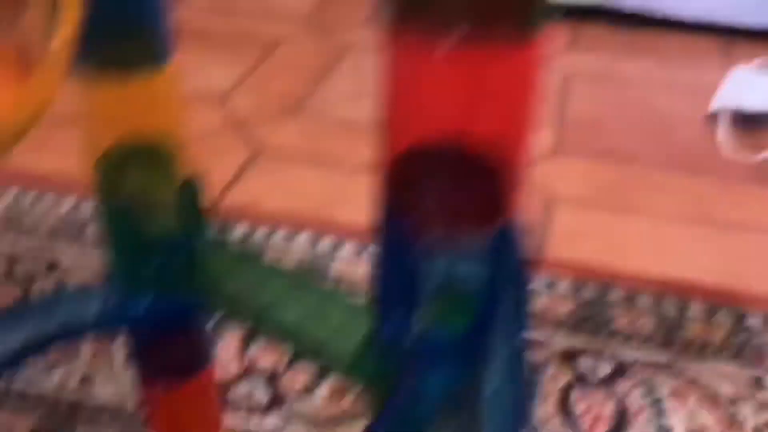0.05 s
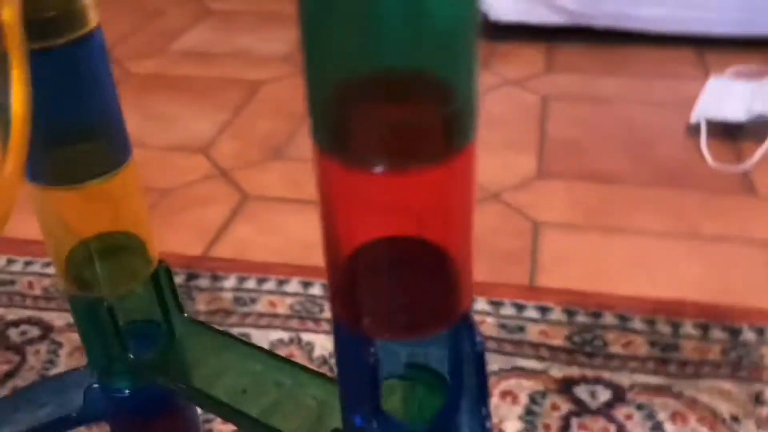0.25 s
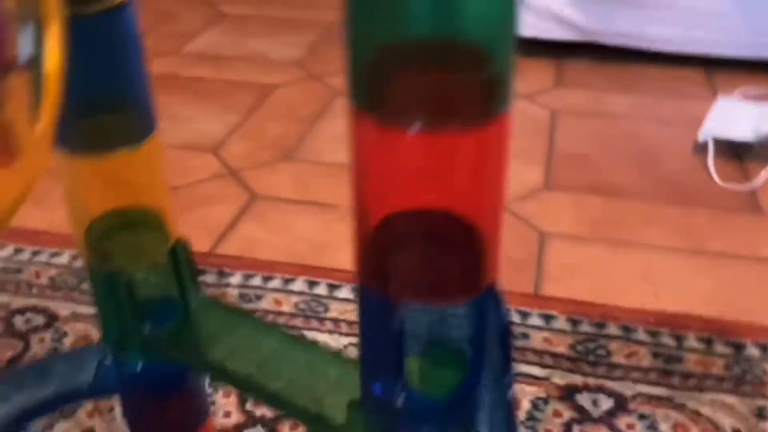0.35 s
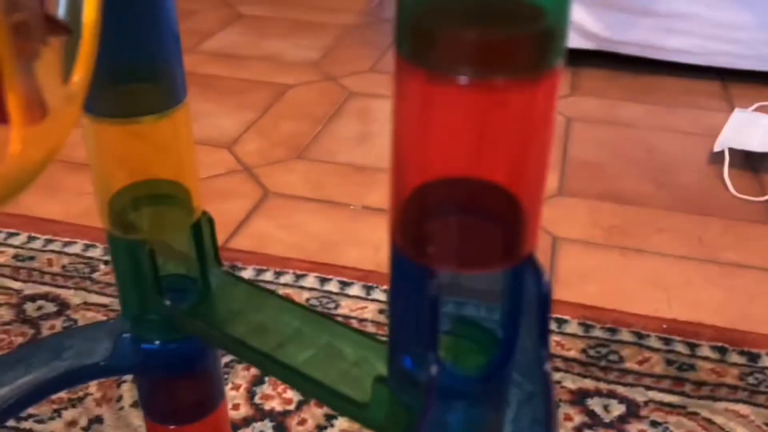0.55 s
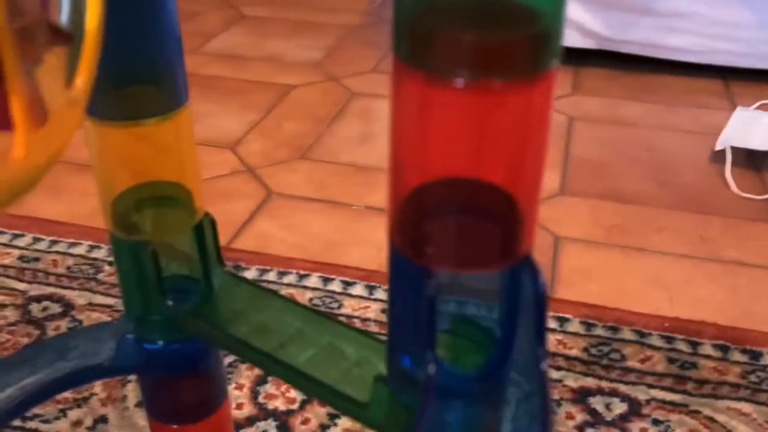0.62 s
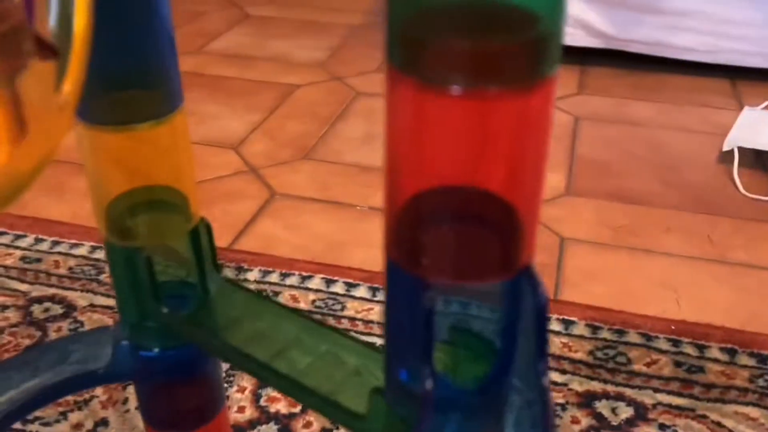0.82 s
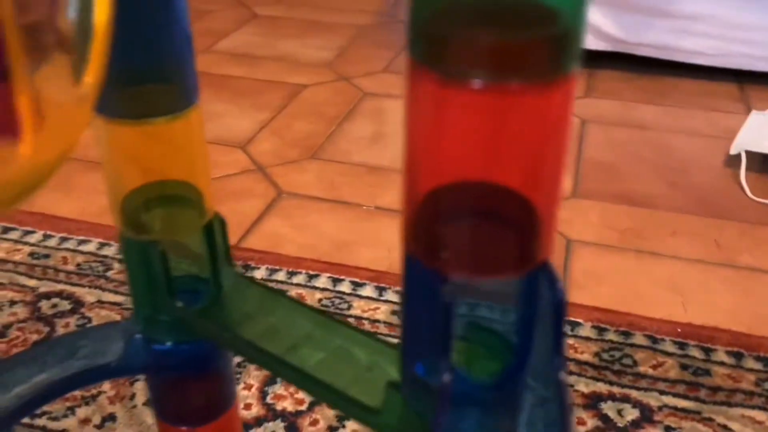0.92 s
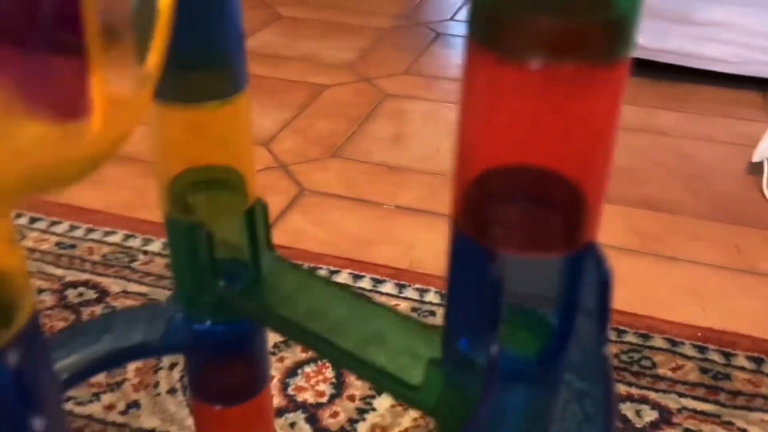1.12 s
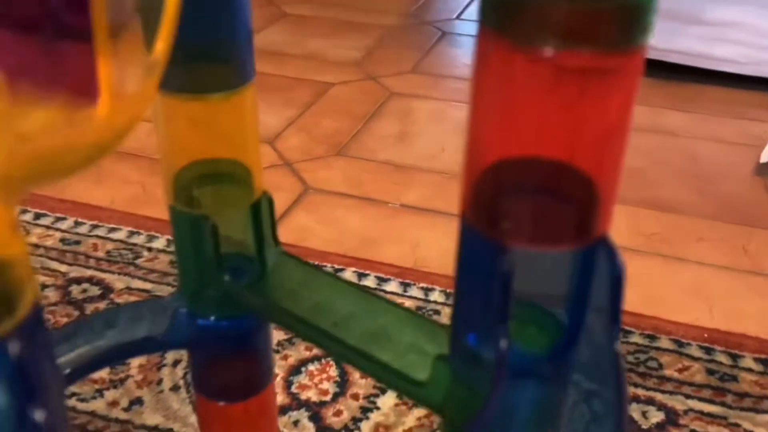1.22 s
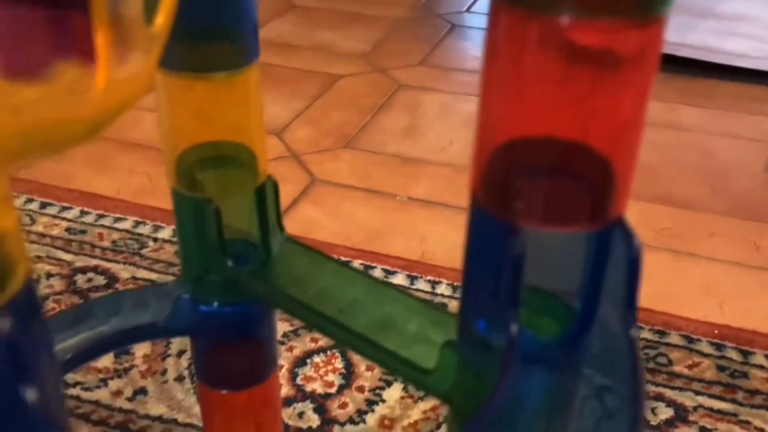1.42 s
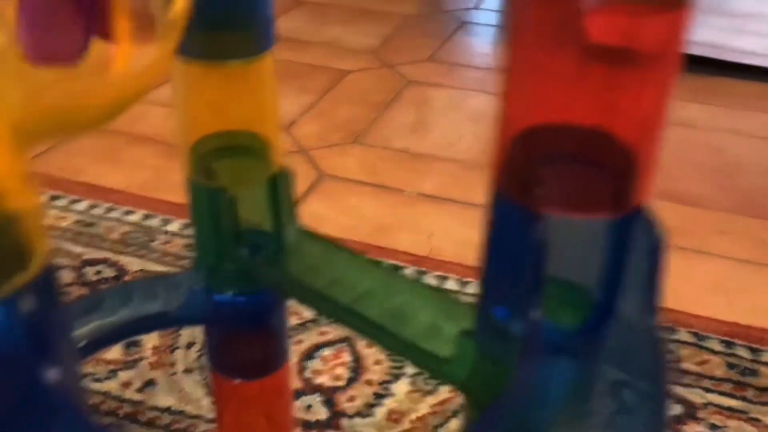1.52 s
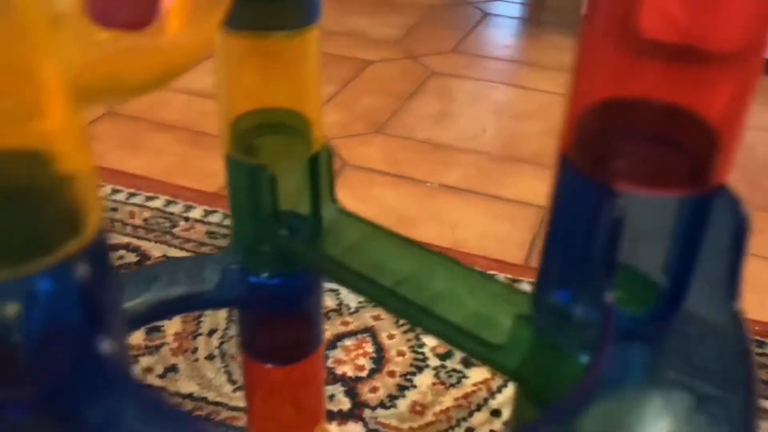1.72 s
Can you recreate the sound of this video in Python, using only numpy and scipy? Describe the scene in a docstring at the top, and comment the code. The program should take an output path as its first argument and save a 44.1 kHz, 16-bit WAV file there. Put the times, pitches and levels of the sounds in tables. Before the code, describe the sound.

A marble clatters through a plastic marble run, close by in a living room. Light taps open over soft funnel rolling. From 0.2 seconds the chute rattles and short knocks crowd in, with faint low thumps. Hollow knocks stand out around 0.8 seconds, bright clacks at 1.1, and hollow knocks again at 1.3. After 1.5 seconds only the soft rolling continues. Faint handling rumble lies underneath.

```python
"""A plastic marble run on a living-room floor, close to a hand-held stereo microphone.
A marble rolls in a funnel, a little to the left, and the first light knocks come down the tubes.
From 0.2 s the chute rattles and the knocks crowd in, each briefly ringing the plastic; heavy landings
sway the tower. Hollow knocks lead around 0.8 s, bright clacks at 1.1 s, hollow ones again at 1.3 s.
After 1.5 s the rolling carries on. Throughout, the hand on the microphone rumbles faintly."""
import sys
import numpy as np
from scipy import signal
from scipy.fft import rfft, irfft, next_fast_len
from scipy.io import wavfile

SR = 44100
rng = np.random.default_rng(int(sys.argv[2]) if len(sys.argv) > 2 else 0)


def wav_out(sig):
    """Save sig, one row per channel (or a flat mono array), as 16-bit PCM at SR to the path in sys.argv[1]."""
    wavfile.write(sys.argv[1], SR, np.round(np.clip(np.atleast_2d(sig).T, -1, 1) * 32767).astype(np.int16))


N = 77175
T = np.arange(N) / SR
RING_T = T[:4096]

# Marble contacts: start_s, thud_db, hollow_knock_db, clack_db, wall_ring_db, tick_db,
# then any pitch_hz of the struck spot, strongest first
CONTACTS = [(.0786, -49, -50, -42, -46, -47), (.1393, -45, -38, -40, -49, -42),
            (.1991, -41, -45, -42, -40, -33), (.2111, -49, -56, -54, -54, -32, 10570),
            (.226, -42, -35, -29, -30, -30, 10350), (.2499, -41, -44, -37, -34, -43),
            (.3296, -35, -29, -30, -25, -28, 3940), (.3574, -47, -35, -34, -31, -39, 3870),
            (.3672, -50, -40, -41, -33, -45, 3930), (.4025, -35, -29, -25, -20, -22, 3420, 2850, 6900),
            (.4365, -42, -32, -40, -42, -32), (.4534, -44, -32, -40, -42, -30, 10900),
            (.4655, -44, -34, -36, -36, -30), (.4746, -31, -28, -25, -21, -25, 3600),
            (.5196, -29, -29, -22, -21, -30, 3600, 650), (.493, -38, -34, -33, -33, -38),
            (.5535, -48, -42, -40, -36, -34), (.5899, -36, -26, -30, -32, -28, 1897),
            (.5954, -34, -38, -29, -28, -25),
            (.6247, -33, -23, -24, -20, -15, 10150, 6767, 5800, 5200, 4323),
            (.6431, -37, -37, -42, -34, -29), (.6687, -41, -29, -28, -29, -22, 1380, 2780),
            (.711, -50, -35, -32, -32, -31), (.7243, -40, -30, -33, -42, -46),
            (.7313, -46, -31, -30, -36, -35), (.745, -45, -26, -28, -35, -39),
            (.7623, -47, -30, -28, -45, -32),
            (.7743, -29, -12, -28, -22, -36, 1735, 1850, 1300, 4350, 3451, 810),
            (.7957, -50, -30, -27, -41, -36, 2386), (.8074, -55, -38, -30, -48, -43),
            (.8289, -29, -19, -20, -27, -37, 2374, 1600, 1860, 4371, 800),
            (.8681, -32, -19, -23, -26, -30, 1690, 2660, 4400), (.882, -43, -29, -42, -34, -28, 8600),
            (.9104, -44, -38, -40, -31, -33), (.9164, -44, -50, -47, -43, -34),
            (.938, -38, -45, -35, -39, -18, 11230, 10600), (.946, -41, -40, -32, -30, -35),
            (.966, -43, -50, -43, -34, -46), (.9825, -39, -35, -40, -27, -35, 4500),
            (1.0457, -55, -58, -46, -45, -39),
            (1.0986, -34, -26, -15, -16, -18, 2708, 3542, 2900, 10350, 7230),
            (1.1216, -37, -29, -19, -19, -22, 2740, 3950, 4800),
            (1.1755, -30, -22, -21, -24, -22, 2550, 1800, 3780), (1.1892, -39, -31, -28, -27, -32),
            (1.2052, -32, -23, -23, -20, -20, 3800, 6837, 1800),
            (1.2276, -30, -19, -24, -23, -27, 1576, 1338, 4600), (1.2489, -44, -28, -24, -27, -31),
            (1.271, -45, -34, -38, -38, -42), (1.315, -50, -37, -48, -43, -39),
            (1.3384, -26, -14, -24, -26, -24, 1800, 1620, 2230, 380),
            (1.4163, -34, -19, -30, -28, -32, 1790, 1640), (1.451, -40, -25, -33, -33, -37, 1730),
            (1.467, -55, -29, -46, -41, -42, 1700)]
# The plastic's registers (thud, hollow knock, clack, wall ring): low_hz, high_hz, dense_t60_s, dense_db
REGISTERS = [(342, 990, 0.039, 1.5), (1178, 1905, 0.035, -2.5), (2070, 3200, 0.042, -1.5),
             (3010, 5260, 0.033, 0)]
# Earlier arrival at the microphone's left side, for the four registers and the tick: lead_ms
ARRIVAL_LEADS = [.09, .115, .05, .04, -.272]
def knocks():
    """Each contact rings four registers of the plastic and ticks; the struck spot's modes stand out."""
    spot_over_ring_db, spot_over_tick_db, trim_db = 7, 3, .3
    tower_pan = from_db([[2.5], [-2.5]])   # the thud comes from the tower on the left
    out = np.zeros((2, N))
    for start_s, thud_db, knock_db, clack_db, ring_db, tick_db, *spot_hz in CONTACTS:
        voices = [at_level(plastic_ring(*register), -spot_over_ring_db) for register in REGISTERS]
        voices.append(at_level(tick(), -spot_over_tick_db))
        levels_db = (thud_db, knock_db, clack_db, ring_db, tick_db)
        aside_ms = .01 * rng.standard_normal()   # contacts lie on different parts of the run
        for register, (voice, db, lead_ms) in enumerate(zip(voices, levels_db, ARRIVAL_LEADS)):
            own_hz = [hz for hz in spot_hz if sum(hz > band[1] for band in REGISTERS) == register]
            sound = at_level(voice + at_level(struck_spot(own_hz), 0), db + trim_db)
            if register == 0:
                sound = sound * tower_pan
            place(out, sound, start_s, (lead_ms + aside_ms) / 1000)
    low_cut = signal.butter(2, 234, "high", fs=SR, output="sos")   # the knocks carry little below about 234 Hz
    return signal.sosfilt(low_cut, out)


# Main resonances of the plastic: pitch_hz, relative_db, t60_s
PLASTIC_MODES = [(410, -16, 0.028), (642, -10, 0.045), (800, 1.5, 0.029), (1318, -9.5, .016),
                 (1538, -3.5, .016), (1772, -1.5, 0.011), (1883, -3.5, 0.026), (2400, -5.5, .024),
                 (2710, 1.5, 0.031), (2776, -4.5, 0.027), (3507, 5.5, 0.036), (3870, -13.5, 0.015),
                 (4420, 13, 0.02), (5050, 8, .016)]
def plastic_ring(low_hz, high_hz, dense_t60_s, dense_db):
    """One blow on one register of the plastic: a few strong modes amid many weak ones."""
    level_spread_db, pitch_spread = 5.5, .016   # each contact finds another spot on another part
    strong = 0
    for hz, db, t60_s in PLASTIC_MODES:
        strength, detune = rng.standard_normal(2)
        if low_hz <= hz < high_hz:
            gain = from_db(db + level_spread_db * strength)
            strong = strong + gain * mode(hz * (1 + pitch_spread * detune), t60_s)
    band = signal.butter(2, [low_hz, high_hz], "band", fs=SR, output="sos")
    dense = signal.sosfilt(band, white_burst() * decay(dense_t60_s))
    return (at_level(strong, 0) + at_level(dense, dense_db)) * swell()


def struck_spot(pitches_hz, step_db=3.5, t60_at_1khz_s=.026):
    """The struck spot's own modes start together; the higher ones die sooner."""
    out = np.zeros(len(RING_T))
    for rank, hz in enumerate(pitches_hz):
        t60_s = t60_at_1khz_s * (1000 / hz) ** .4
        out += from_db(-step_db * rank) * np.sin(2 * np.pi * hz * RING_T) * decay(t60_s)
    return out * swell()


# Spectrum of the tick at close range: frequency_hz, gain_db
TICK_SPECTRUM = [(1500, -41.5), (4500, -12.5), (5900, 0), (7000, 2), (8200, -1.5), (9100, -4), (10300, 2),
                 (11800, -3.5), (13500, -7), (15200, -6.5), (17000, -28)]
def tick():
    """The hard snap of glass on plastic, with a short bright tail."""
    envelope = decay(t60_s=.015) + from_db(-3) * decay(t60_s=.021)
    return colour(white_burst() * envelope * swell(build_up_s=.0001), TICK_SPECTRUM)


# Rattle of the chute at the microphone: time_s, level_db
RATTLE_LEVELS = [(0, -50), (.18, -55.5), (.23, -32), (.29, -49), (.40, -39.5), (.44, -32), (.53, -33),
                 (.58, -39.5), (.65, -37), (.70, -48), (.8, -42), (.86, -50.5), (.95, -41), (1.05, -45.5),
                 (1.22, -52), (1.255, -32), (1.32, -53), (1.47, -39), (1.53, -53), (1.75, -59)]
# Resonances of the chute: frequency_hz, gain_db
RATTLE_SPECTRUM = [(200, -15), (600, 1.5), (1100, -24), (1700, 11.5), (2200, 6.5), (2700, 5), (4300, 4.5),
                   (6000, -7.5), (7300, -6), (9100, -19), (10800, -7), (13500, -20), (15300, -20),
                   (17000, -17)]
def rattle(hops_per_s=300, spread_db=3.2, spot_count=6):
    """A marble makes tiny hops along the chute, landing on spots that each ring briefly."""
    hops = rng.random(N) < hops_per_s / SR
    blows = hops * from_db(spread_db * np.minimum(rng.exponential(1, N), 3))
    spots = rng.integers(0, spot_count, N)
    out = np.zeros((2, N))
    for spot in range(spot_count):
        ring = white_burst(width=1) * decay(t60_s=.023)
        out += signal.fftconvolve([blows * (spots == spot)], ring, axes=1)[:, :N]
    return rms_one(colour(out, RATTLE_SPECTRUM)) * from_db(curve(RATTLE_LEVELS, T))


# Rise and fall of the rolling: time_s, relative_db
ROLLING_LEVELS = [(0, -37.5), (.17, -41.5), (.32, -39), (.5, -34.5), (.8, -41), (1.05, -40), (1.25, -37),
                  (1.4, -40.5), (1.75, -38.5)]
# Hollow resonances of the funnel: frequency_hz, gain_db
FUNNEL_SPECTRUM = [(100, -40), (200, -16.5), (420, -12.5), (660, -7.5), (850, -1.5), (1000, -2.5),
                   (1250, -8.5), (1620, 3.5), (1850, 2.5), (2200, -9.5), (2720, -4), (3300, -16.5),
                   (4500, -21), (6000, -36.5), (7400, -30.5), (9000, -64), (11000, -42), (16000, -60)]
def rolling(trim_db=2.5):
    """A marble circling in the funnel keeps the hollow resonances murmuring."""
    return stereo_noise(FUNNEL_SPECTRUM) * from_db(curve(ROLLING_LEVELS, T) + trim_db)


# Heavy landings, heard in the centre: start_s, pitch_hz, envelope_db, t60_s
LANDINGS = [(.33, 133, -49, 0.13), (.625, 70.6, -52, 0.17), (0.786, 80.7, -50, 0.24),
            (.96, 79.8, -51, 0.27), (1.338, 59.6, -43, 0.028), (1.338, 290, -18, .018)]
def tower_thumps(build_up_s=.0025):
    """The tower sways against the floor after a heavy landing, low and soft."""
    out = np.zeros((2, N))
    for start_s, hz, db, t60_s in LANDINGS:
        t = np.maximum(T - start_s, 0)
        out += from_db(db) * np.sin(2 * np.pi * hz * t) * swell(build_up_s, t) * decay(t60_s, t)
    return out


# Tone of the living room's reflections: frequency_hz, gain_db
ROOM_SPECTRUM = [(100, 1), (700, 1.5), (1700, -0.5), (4000, 3.5), (8000, -5), (16000, -22)]
def room(x, t60_s=.35, delay_s=.0079, send_db=-15.5):
    """The furnished room returns a diffuse tail, different on each side of the microphone."""
    t = T[:SR // 2]
    tail = rng.standard_normal((2, len(t))) * decay(t60_s, t) * (t > delay_s)
    tail = colour(tail / np.sqrt(np.sum(tail ** 2) / 2), ROOM_SPECTRUM)
    return from_db(send_db) * signal.fftconvolve(x, tail, axes=1)[:, :N]


# Handling noise at the microphone: time_s, level_db
HANDLING_LEVELS = [(0, -77), (.31, -61.5), (.4, -57.5), (.9, -63), (1.12, -56), (1.45, -67.5), (1.75, -78)]
# Spectrum of the handling noise: frequency_hz, gain_db
HANDLING_SPECTRUM = [(20, -37), (45, -24), (80, 9.5), (110, 5), (165, 14.5), (260, -1), (500, -51)]
def handling():
    """The hand holding the microphone makes a faint rumble."""
    return stereo_noise(HANDLING_SPECTRUM) * from_db(curve(HANDLING_LEVELS, T))


# Likeness of the microphone's two channels: frequency_hz, correlation
CHANNEL_LIKENESS = [(60, 0.67), (500, 1), (1500, 1), (3000, 0.24), (8000, 0.075)]
def stereo_noise(spectrum, left_lead_ms=.2):
    """Coloured noise of rms 1, wide in the treble, reaching the left side first."""
    size = 2 * next_fast_len(N // 2 + 1)
    alike = per_bin(CHANNEL_LIKENESS, size)
    mid, side = rfft(rng.standard_normal((2, size)))
    channels = np.sqrt(1 + alike) * mid + np.sqrt(1 - alike) * side * [[1], [-1]]
    left, right = irfft(from_db(per_bin(spectrum, size)) * channels)
    right = np.roll(right, int(left_lead_ms * SR / 1000))
    return rms_one(np.array([left, right])[:, :N])


def mode(hz, t60_s):
    """One decaying sine, slightly out of step between the channels."""
    phase = rng.uniform(0, 2 * np.pi) + .27 * rng.standard_normal((2, 1))
    return np.sin(2 * np.pi * hz * RING_T + phase) * decay(t60_s)


def white_burst(width=.54):
    """White noise shared by both channels, plus each one's own, scaled by width."""
    return rng.standard_normal(len(RING_T)) + width * rng.standard_normal((2, len(RING_T)))


def swell(build_up_s=.00091, t=RING_T):
    """A ring takes a moment to spread through the part."""
    return 1 - np.exp(-t / build_up_s)


def decay(t60_s, t=RING_T):
    """Envelope that falls 60 dB in t60_s."""
    return np.exp(-np.log(1000) * t / t60_s)


def at_level(x, db, window_s=.0071):
    """Give the start of a ring its rms level."""
    onset = x[..., RING_T < window_s]
    return from_db(db) * x / np.sqrt(np.mean(onset ** 2) + 1e-20)


def place(out, x, start_s, left_lead_s):
    """Mix in a stereo sound, its right channel shifted by left_lead_s."""
    for channel, arrival_s in enumerate((start_s, start_s + left_lead_s)):
        i = int(arrival_s * SR)
        out[channel, i:i + x.shape[1]] += x[channel, :N - i]


def colour(x, spectrum):
    """Causal (minimum-phase) filter with a (frequency_hz, gain_db) response."""
    size = 2 * next_fast_len(x.shape[-1])
    cepstrum = irfft(np.log(from_db(per_bin(spectrum, size))))
    cepstrum[1:size // 2] *= 2
    cepstrum[size // 2 + 1:] = 0
    return irfft(rfft(x, size) * np.exp(rfft(cepstrum)))[..., :x.shape[-1]]


def per_bin(rows, size):
    """Read (frequency_hz, value) rows on an FFT grid."""
    hz, value = np.transpose(rows)
    bin_hz = np.arange(size // 2 + 1) * SR / size
    return np.interp(np.log(bin_hz + 1), np.log(hz), value)


def curve(rows, t):
    """Read (time_s, value) rows at times t."""
    return np.interp(t, *np.transpose(rows))


def from_db(db):
    """Decibels to gain."""
    return 10 ** (np.asarray(db) / 20)


def rms_one(x):
    """Scale to rms 1."""
    return x / np.sqrt(np.mean(x ** 2) + 1e-20)


def scene():
    """Close knocks and rattle with their room tail, over thumps, rolling and handling rumble."""
    contacts = knocks() + rattle()
    return contacts + room(contacts) + tower_thumps() + rolling() + handling()


def record(dry):
    """The recorder rounds the highest peaks and cuts the top of the treble."""
    ceiling, cutoff_hz = .82, 16500
    rounded = dry / (1 + (dry / ceiling) ** 8) ** .125
    return signal.sosfilt(signal.ellip(10, .1, 80, cutoff_hz, fs=SR, output="sos"), rounded)


dry = scene()
out = record(dry)
wav_out(out)
```